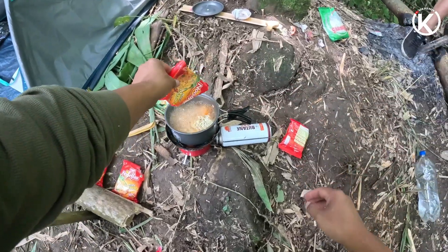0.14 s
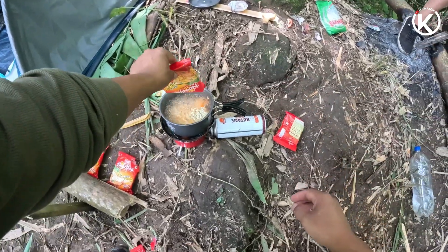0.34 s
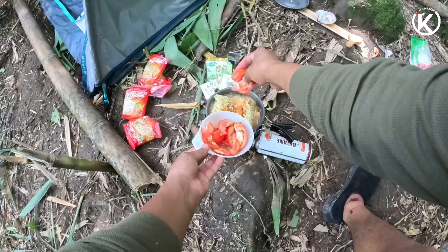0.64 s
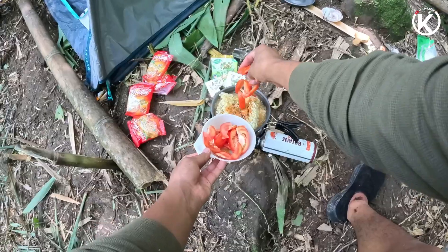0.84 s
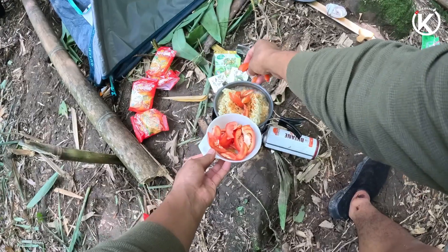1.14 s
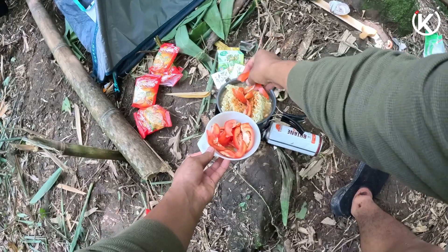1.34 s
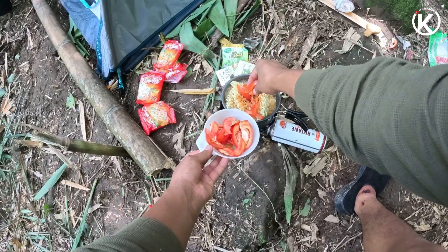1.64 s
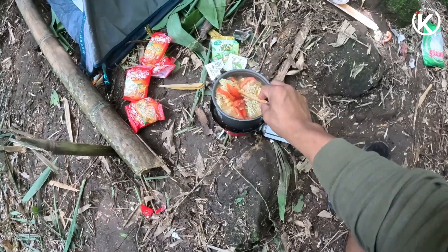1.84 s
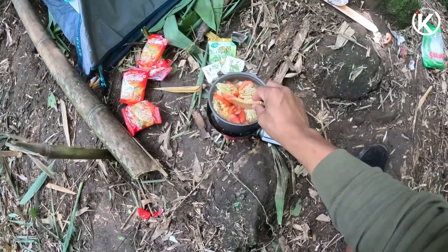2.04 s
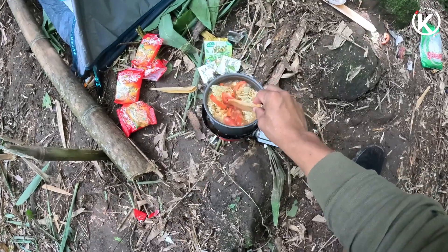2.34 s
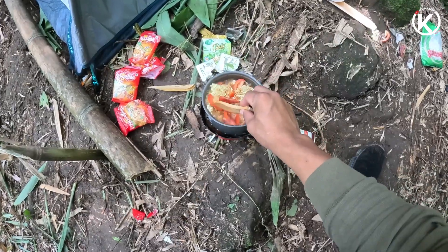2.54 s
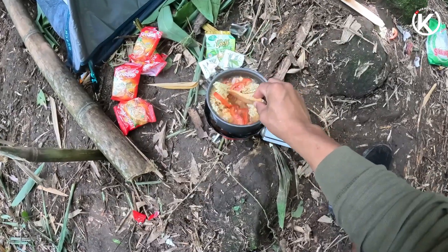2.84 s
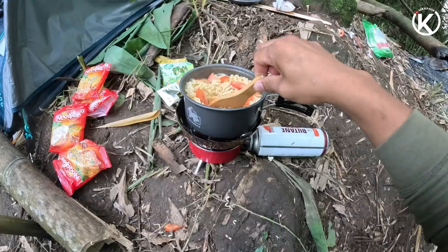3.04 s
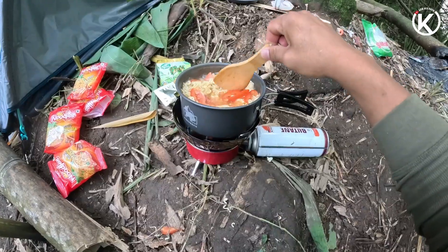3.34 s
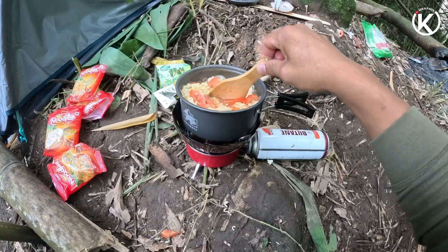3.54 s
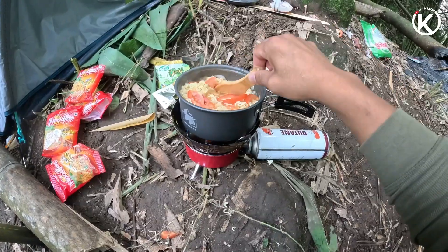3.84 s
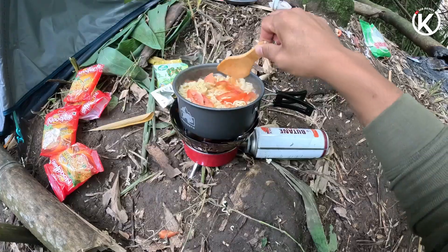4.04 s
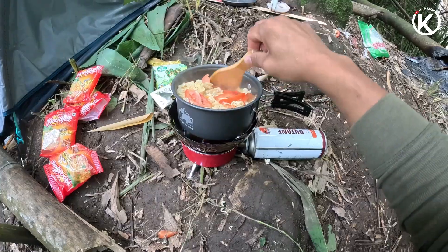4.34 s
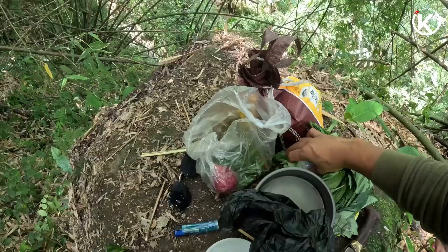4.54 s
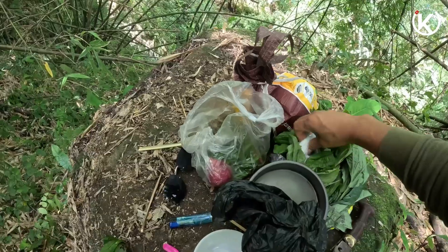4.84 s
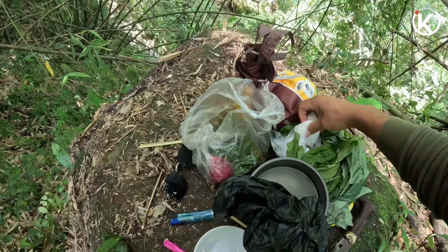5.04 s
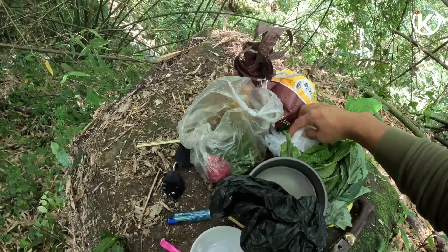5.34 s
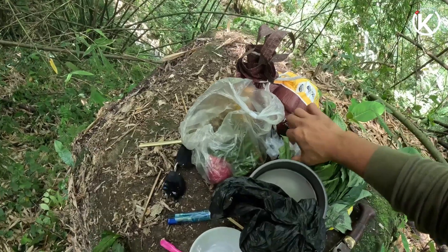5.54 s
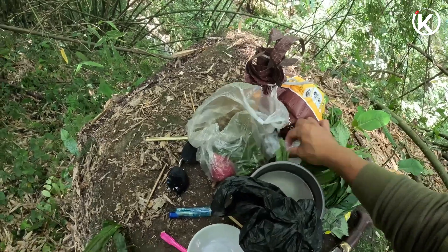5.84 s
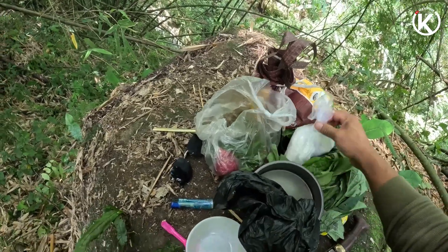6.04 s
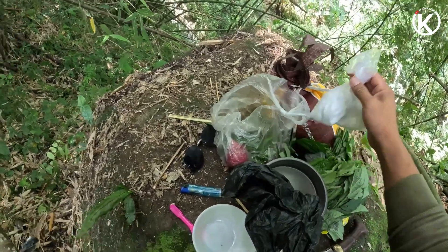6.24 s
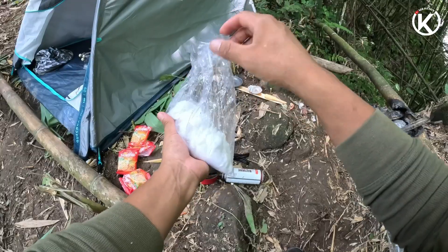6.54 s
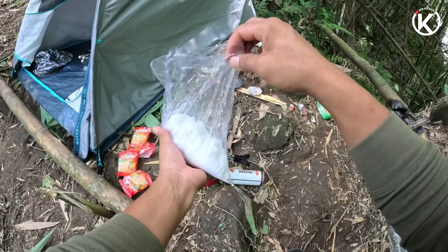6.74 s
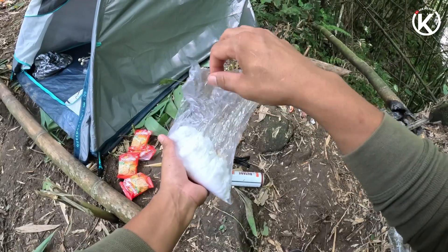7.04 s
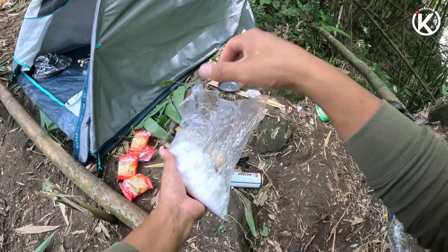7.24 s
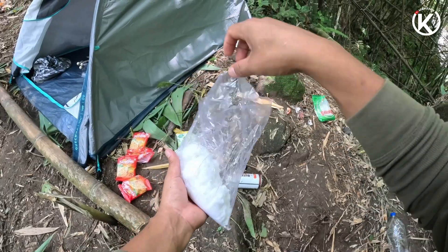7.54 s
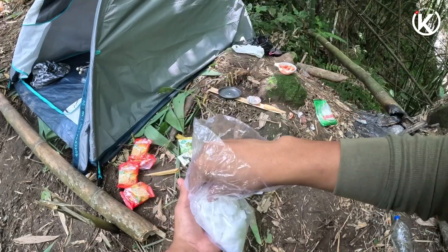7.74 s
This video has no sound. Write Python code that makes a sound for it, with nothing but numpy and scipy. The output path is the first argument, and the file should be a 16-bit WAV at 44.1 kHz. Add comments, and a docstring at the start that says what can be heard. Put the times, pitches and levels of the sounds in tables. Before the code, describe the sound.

Steady gas hiss and soft bubbling at a forest camp, spoon clacks and rummaging, then sharp thin plastic crackles over buzzing insects.

```python
"""A gas burner roars and hisses under a simmering pot at a forest camp, heard by microphones worn on the chest.
The flame and jet are shaped noise; the broth is many tiny rising tones and a sizzle of clicks.
Far insects drone as narrow noise bands and one whines as a wavering tone near 8 kHz.
Hands stir, rummage through leaves and crumple a thin plastic bag: showers of clicks, with louder snaps and bumps.
Air and body movement rock the microphones. Seven short shots fade in quickly, with brief silences between."""
import sys
import numpy as np
from scipy import signal
from scipy.fft import rfft, irfft, next_fast_len
from scipy.io import wavfile
from scipy.ndimage import uniform_filter1d

SR = 44100
rng = np.random.default_rng(int(sys.argv[2]) if len(sys.argv) > 2 else 0)


def put_to_file(sound):
    """Save the sound as 16-bit audio at rate SR, in the file named by the first command-line argument."""
    columns = np.atleast_2d(sound).T  # one column per channel
    safe = np.clip(columns, -1, 1)
    whole_steps = np.round(safe * 32767)
    wavfile.write(sys.argv[1], SR, whole_steps.astype(np.int16))


def field_ratio(decibels):
    """Amplitude ratio for a level in dB (20 dB per decade); scalars and array-likes work."""
    return 10 ** (np.asarray(decibels, dtype=float) / 20)


N = 348390
TIME, HZ = np.arange(N) / SR, np.fft.rfftfreq(next_fast_len(N), 1 / SR)

# how busy the hands are, stirring and then rummaging; they are idle after the last row:
# (time [s], rustle level [dB], dull knocking level [dB])
HAND_ACTIVITY = [(0.0, -49, -56), (0.14, -45, -60), (0.25, -49.5, -71), (0.55, -52, -51),
                 (0.62, -64, -53.5), (1.1, -57.5, -54), (1.73, -50.5, -55.5), (1.8, -51, -50),
                 (2.2, -50, -72), (2.55, -47.5, -53), (2.88, -50.5, -62), (2.96, -57.5, -70),
                 (3.7, -53.5, -67), (3.85, -54, -51.5), (4.0, -55, -70), (4.15, -51, -57),
                 (4.41, -53.5, -64), (4.49, -44.5, -48.5), (5.2, -40.5, -49.5), (5.28, -46.5, -73),
                 (5.38, -42, -49), (5.62, -42.5, -51.5), (5.9, -41, -43.5), (6.06, -39, -46.5),
                 (6.3, -41.5, -57)]


def unit(x):
    """Scale to an rms (average strength) of 1."""
    return x / np.sqrt(np.mean(x ** 2))


def sound(spectrum):
    """Turn a spectrum back into samples."""
    return irfft(spectrum, next_fast_len(N))[..., :N]


def filtered(x, gain):
    """Make each frequency louder or softer by its own gain."""
    return sound(rfft(x, next_fast_len(N)) * gain)


def colour(points):
    """Gain per frequency through (Hz, dB) points, dropping 30 dB just outside them."""
    hz, db = np.transpose(points)
    all_hz = np.r_[hz[0] / 2, hz, hz[-1] * 1.2]
    all_db = np.r_[db[0] - 30, db, db[-1] - 30]
    return field_ratio(np.interp(np.log(HZ + 1), np.log(all_hz), all_db))


def peak(hz, width):
    """Power shape of one resonance, a pitch that rings out above its neighbours."""
    return 1 / (1 + (2 * (HZ - hz) / width) ** 2)


def noise(gain):
    """Spectra of two unrelated noises with the given gain per frequency."""
    real, imaginary = rng.standard_normal((2, 2, len(HZ)))
    return (real + 1j * imaginary) * gain


def walk(rate):
    """A wandering curve: random levels 1 / rate seconds apart, joined by ramps; spread 1."""
    levels = rng.standard_normal(int(rate * TIME[-1]) + 2)
    steps = uniform_filter1d(np.repeat(levels, 4), size=4)
    return np.interp(TIME * rate * 4, np.arange(len(steps)), steps / steps.std())


def flutter(gain, centres, flicker_db, rate):
    """Two streams of coloured noise whose pitch ranges flicker on their own."""
    source = noise(gain)
    total = 0
    for row in np.eye(len(centres)):
        one_range = np.interp(np.log(HZ + 1), np.log(centres), row)
        total = total + field_ratio(flicker_db * walk(rate)) * sound(source * one_range)
    return unit(total)


def grains(count, spread_db):
    """Two unrelated streams of clicks at random times, a few of them much louder."""
    out = np.zeros((2, N))
    loudness = field_ratio(spread_db * np.minimum(rng.exponential(size=(2, count)), 5))
    size = rng.standard_normal((2, count)) * loudness
    np.put_along_axis(out, rng.integers(0, N, (2, count)), size, axis=1)
    return out


def crackle(points, count, spread_db, ring_s):
    """Creases of three sizes snap independently, each in its own range and smeared into a short burst."""
    spectrum = 0
    for k in range(3):
        octaves = np.log2(np.maximum(HZ, 1500) / 1500)
        size = 0.14 + np.clip(1 - abs(octaves / 1.49 - k), 0, 1)
        # a randomly drifting phase spreads each click out in time
        phase = np.cumsum(rng.standard_normal(len(HZ))) * np.sqrt(ring_s * 4 * np.pi * HZ[1])
        clicks = rfft(grains(count, spread_db), next_fast_len(N))
        spectrum = spectrum + clicks * size * np.exp(1j * phase)
    return unit(sound(spectrum * colour(points)))


def per_shot(name):
    """Hold one named column of the shot table (or the shot's number) until the next shot starts."""
    # (start [s], end [s], flame roar [dB], gas hiss [dB], sizzle [dB], insect drone [dB], whine [dB],
    #  stereo width [0-1], lag of the left side [rad])
    shots = np.array([(-.050, 0.551, -61, -47, -55.5, -56, -55.5, 0.31, 0.53),
                      (0.603, 1.733, -52.5, -46.5, -58, -59, -56, 0.31, 0.49),
                      (1.783, 2.89, -52.5, -47, -53, -54, -55, 0.33, 0.4),
                      (2.941, 4.418, -50.5, -48.5, -77, -51.5, -66, 0.03, .01),
                      (4.467, 6.302, -58, -46, -54.5, -43, -73, 0.34, 0.38),
                      (6.35, 7.674, -54.5, -46.5, -59.5, -50, -81, 0.23, 0.064),
                      (7.724, 7.950, -54, -42, -54.5, -48.5, -72, 0.29, 0.21)])
    names = ["start", "end", "roar", "hiss", "sizzle", "drone", "whine", "width", "lag"]
    shot = np.clip(np.searchsorted(shots[:, 0], TIME) - 1, 0, None)
    return shot if name == "number" else shots[shot, names.index(name)]


def insects():
    """Many far singers blur into noise bands near multiples of one buzz rate; one holds a thin, wavering whine."""
    # bands of the drone: (pitch [Hz], width of the resonance shape [Hz], level against the other bands [dB])
    drone_bands = [(981, 65, -1.5), (1951, 122, -1), (2950, 170, -3.5), (3836, 53, -1.5), (4935, 170, -10)]
    bands = 0
    for hz, width, db in drone_bands:
        bands = bands + field_ratio(db + 0.79 * walk(30)) * sound(noise(peak(hz, width) ** 0.68))

    whine_hz, waver_hz, flicker_db = 7957, 12.2, 1.7
    turn = 2 * np.pi * np.cumsum(whine_hz + waver_hz * walk(40)) / SR
    whine = unit(np.sin(turn) * field_ratio(flicker_db * walk(25.1)))
    shares = np.array([[1], [.3]])  # weaker in the stream that differs between the ears
    return field_ratio(per_shot("drone")) * unit(bands) + field_ratio(per_shot("whine")) * whine * shares


def sway():
    """Slow pressure swings, partly unlike on the two ports, swelling at random and at each lurch."""
    # tone of air and body movement: (frequency [Hz], gain [dB])
    sway_tone = [(2.4, -32), (4.0, 1.5), (17, 2), (25, -1), (60, -9), (87, -25), (120, -22.5), (160, -47),
                 (260, -120)]
    # air and body movement on the microphones, one value per shot: (level [dB])
    sway_levels = np.array([-59.5, -53.5, -44, -54.5, -53.5, -55, -52])
    # lurches of the body that rock the microphones harder: (time [s], level added [dB])
    body_lurches = [(1.9, -48), (4.07, -46), (5.08, -48), (5.6, -43), (6.05, -52), (6.17, -51), (6.51, -51),
                    (6.79, -51), (7.5, -47), (7.74, -49)]
    wander_db, lurch_s = 3, 0.05  # random swell; time from a lurch's middle until it has mostly faded
    both, apart = unit(sound(noise(colour(sway_tone))))
    level = field_ratio(sway_levels[per_shot("number")] + wander_db * walk(7))
    for s, db in body_lurches:
        level = level + field_ratio(db) * np.exp(-((TIME - s) / lurch_s) ** 2)
    return level * (both + 1.3 * per_shot("width") * apart * np.array([[1], [-1]]))


def bumps():
    """A dull bump on the microphone body is one hard push and a fainter ring, later on the left port."""
    # (time [s], peak level [dB], pitch [Hz], time for the ring to fade by 60 dB [s], left minus right [dB])
    body_bumps = [(0.533, -29, 180, 0.04, -2), (0.698, -36, 260, 0.05, -10), (0.749, -38, 221, 0.04, -2.0),
                  (0.999, -30, 570, 0.029, 0.5), (1.228, -34, 288, 0.045, -6), (1.699, -38, 164, 0.04, -5),
                  (1.792, -21, 174, 0.061, -8), (2.48, -20, 360, 0.055, -11), (2.496, -15, 330, 0.035, -6),
                  (2.51, -18, 343, 0.037, -15), (4.048, -28, 41.3, 0.033, 0), (4.514, -36, 509, 0.031, -5),
                  (5.829, -38, 607, 0.04, 4), (5.879, -24, 600, 0.15, -2), (5.949, -36, 560, 0.037, 3),
                  (6.189, -26.5, 199, 0.08, -0.5), (7.737, -34, 94, 0.029, 2)]
    left_lag_rad = 1.24
    overtone, overtone_db = 2.3, -8  # the body's second way of ringing: pitch ratio and level
    out = np.zeros((2, N + SR))
    t = np.arange(SR // 8) / SR
    for s, db, hz, t60, pan_db in body_bumps:
        push = 0.95 * np.exp(-((t * hz - .75) / 0.21) ** 2)
        fade = field_ratio(-60 * t / max(t60, .005)) + push
        turn = 2 * np.pi * hz * t - np.array([[left_lag_rad], [0]])
        tones = np.sin(turn) + field_ratio(overtone_db) * np.sin(overtone * turn)
        ring = tones * fade * np.minimum(t * hz * 2, 1)  # starts up within half a cycle
        i = int(s * SR)
        out[:, i:i + len(t)] += field_ratio(db + np.array([[pan_db], [-pan_db]]) / 2) * ring / abs(ring).max()
    return out[:, :N]


def hands():
    """Dense small crackles that come in fits, with duller knocks and gurgles under them."""
    # tone of the rustle and of the knocks: (frequency [Hz], gain [dB])
    rustle_tone = [(700, -24), (1500, -5), (3000, -2), (4200, -4), (6000, -6), (8900, -10.5), (11000, -28),
                   (12200, -30), (13300, -35), (15000, -38)]
    knock_tone = [(120, -31), (300, -3.5), (580, 6.5), (850, -5.5), (1600, -5), (3000, -27)]
    s, rustle_db, knock_db = np.transpose(HAND_ACTIVITY)
    rustle = crackle(rustle_tone, count=9000, spread_db=1.0, ring_s=0.00041)
    rustle = rustle * field_ratio(0.59 * walk(30) + 0.47 * walk(6.6))
    knock = unit(filtered(grains(count=2400, spread_db=0.5), colour(knock_tone))) * field_ratio(2.84 * walk(9))
    rustle_level = field_ratio(np.interp(TIME, s, rustle_db, right=-120))
    knock_level = field_ratio(np.interp(TIME, s, knock_db, right=-120))
    return rustle_level * rustle + knock_level * knock


def bag():
    """Each squeeze is a quick swell of creases giving way, ragged within."""
    # tone of the thin plastic: (frequency [Hz], gain [dB])
    bag_tone = [(35, -23), (60, 1.5), (209, -7), (276, -8.5), (711, -3), (1420, -11), (2650, -6),
                (3120, -9), (5430, -9.5), (6530, -15), (7500, -11.5), (9900, -21), (15000, -41.5)]
    # a wrapper crumples, the spoon scrapes, the bag is squeezed:
    # (start [s], length [s], share spent rising [0-1], level [dB], brightness tilt [relative, positive is brighter])
    squeezes = [(.004, 0.03, 0.85, -41, 5.5), (0.102, 0.048, 0.55, -43.5, 6),
                (4.221, 0.057, 0.6, -45, -2.5), (6.055, 0.065, 0.3, -36.5, 3),
                (6.258, 0.013, 0.4, -41.5, -1), (6.328, 0.23, 0.29, -33.5, 1.9),
                (6.59, 0.092, 0.14, -43, 0), (6.668, 0.065, 0.42, -35, 1.8), (6.724, 0.12, 0.6, -28, 0.7),
                (6.872, 0.044, 0.36, -31.5, 1), (6.92, 0.056, 0.46, -39, 1.2),
                (7.378, 0.022, 0.25, -41.5, -7), (7.397, 0.028, 0.16, -31.5, -1),
                (7.44, 0.029, 0.56, -31.5, -2), (7.457, 0.055, 0.09, -28.5, 0.2),
                (7.484, .055, 0.54, -31, -0.5), (7.54, .030, 0.5, -43, -1), (7.571, 0.039, 0.3, -36.5, 1),
                (7.630, 0.018, .3, -46, 1), (7.806, 0.07, 0.4, -37, 1.5), (7.872, 0.028, 0.05, -34.5, 1.5)]
    creases = crackle(bag_tone, count=22000, spread_db=2.5, ring_s=0.00029) * field_ratio(1.15 * walk(120))
    bright = unit(filtered(creases, np.log2((HZ + 50) / 2000)))
    out = np.zeros((2, N))
    for start, length, rise, db, tilt in squeezes:
        now = slice(int(start * SR), int((start + length) * SR))
        corners = [start, start + rise * length, start + length]
        swell = np.interp(TIME[now], corners, [0, 1, 0]) ** .5
        tilted = creases[:, now] + np.log(10) / 20 * tilt * bright[:, now]
        out[:, now] += field_ratio(db) * swell * tilted
    return out


def ticks(count):
    """Rows of fainter snaps, scattered while the hands work and as loud as they are busy."""
    s, rustle_db, _ = np.transpose(HAND_ACTIVITY)
    when, size, pitch, pan = rng.random((count, 4)).T
    when = .01 + when * s[-1]
    db = np.interp(when, s, rustle_db) + 12 - 8 * size  # 4 to 12 dB above the rustle level
    hz = 3500 * 2 ** (2.5 * (pitch - .5))
    octaves = np.full(count, 1.3)
    return np.transpose([when, db, hz, octaves, 4 * (pan - .5)])


def snaps():
    """A snap is a burst of a few cycles that starts fast and dies away a little slower."""
    # the clearest snaps of creases, spoon and simmer:
    # (time [s], peak level [dB], pitch [Hz], width [octaves], left minus right [dB])
    clear_snaps = [(0.0982, -16.5, 8500, 0.99, 5), (0.1045, -34, 1300, 0.8, 0),
                   (0.1295, -23, 4300, 0.55, 1), (2.4288, -24, 4280, 1, 0), (2.4975, -22, 2510, 1.1, 4),
                   (2.578, -28, 1600, 0.61, 0), (2.68, -27, 2330, 1.5, -1), (2.7838, -28, 3600, 1.2, -2),
                   (2.8608, -26, 1470, 0.69, -1), (3.4463, -32.5, 1170, 0.73, 0),
                   (3.765, -17.5, 2920, 1.8, 4), (3.797, -21.5, 2730, 0.97, 4),
                   (3.9176, -33, 1280, 0.61, 0), (4.1716, -26.5, 1670, 1.4, -1.5),
                   (4.2392, -24, 1220, 1.9, 1), (4.7215, -23, 3930, 0.95, -1), (4.799, -20, 4860, 0.49, -1),
                   (5.1698, -12.5, 8900, 1.2, -2), (5.7219, -19, 8560, 1.24, 1),
                   (5.9554, -21, 7200, 1.7, -2), (6.057, -16, 6050, 1.4, -3), (6.0969, -16, 8560, 1.2, -3),
                   (6.265, -16.5, 9340, 1.7, -3), (6.2652, -23, 2250, 0.42, 0), (6.457, -20, 6560, 1, 1),
                   (6.7458, -13, 6000, 1.5, 4), (6.7625, -13, 7750, 0.59, -1), (6.8878, -17, 9340, 1.1, -1),
                   (6.955, -17, 4800, 0.75, 2), (7.3993, -23, 6050, 1.0, 4), (7.4947, -15, 9340, 1.25, 1),
                   (7.5058, -13, 6050, 1.9, 7), (7.854, -15, 8200, 0.66, 5), (7.8759, -12, 6360, 0.95, 4)]
    out = np.zeros((2, N + SR))
    t = np.arange(-SR // 200, SR // 50) / SR
    phases = 2 * np.pi * rng.random(size=99)
    for (s, db, hz, octaves, pan_db), phase in zip([*clear_snaps, *ticks(count=24)], phases):
        length = .5 / (hz * max(octaves, .2))  # wide snaps are short
        shape = np.where(t < 0, np.exp(-(t / length) ** 2), np.exp(-t / (1.8 * length)))
        snap = np.cos(2 * np.pi * hz * t + phase) * shape
        i = int((s + t[0]) * SR)
        out[:, i:i + len(t)] += field_ratio(db + np.array([[pan_db], [-pan_db]]) / 2) * snap
    return out[:, :N]


def bubbles(count):
    """Each bubble rings a few cycles and glides up as it reaches the surface."""
    out, t = np.zeros((2, N + 800)), np.arange(800) / SR
    chance = rng.random((2, count, 3))  # pitch, loudness and time of each bubble
    hz = 1150 * 2 ** (1.25 * (chance[..., :1] - .5))
    tone = np.sin(2 * np.pi * hz * t * (1 + 0.014 * hz * t))
    ring = field_ratio(-14 * chance[..., 1:2]) * tone * np.exp(-t * hz / 7.8)
    for stream in range(2):
        starts = (chance[stream, :, 2:] * N).astype(int)
        np.add.at(out[stream], starts + np.arange(len(t)), ring[stream])
    return unit(out[:, :N])


def burner():
    """The flame roars unevenly, the jet hisses, the broth bubbles and sizzles."""
    # tones of the flame, the gas jet and the sizzle: (frequency [Hz], gain [dB])
    roar_tone = [(60, -9), (110, -2), (220, 1.5), (400, -5), (700, -27), (1500, -51)]
    hiss_tone = [(150, 2.5), (500, 0), (1300, 2), (2500, -1), (4200, -1), (5600, -9.5), (7000, -13.5),
                 (9500, -16), (11000, -25), (12000, -23.5), (13200, -33), (15000, -40)]
    sizzle_tone = [(3500, -23), (5600, -6.5), (7400, 8.5), (9000, 1.5), (10500, -11), (12000, -34),
                   (13300, -36), (15000, -35)]
    # resonances under the pot: (pitch [Hz], width [Hz], height above the hiss [dB])
    pot_resonances = [(3780, 360, 3.5), (4640, 120, 3.5), (5610, 390, 7.5)]
    # bubbling broth, one value per shot: (level [dB])
    simmer_levels = [-62, -53.5, -56.5, -64, -67, -70, -75]
    roar = flutter(colour(roar_tone), [80, 156, 322, 640], flicker_db=2.0, rate=11)
    jet = colour(hiss_tone) * field_ratio(sum(db * peak(hz, width) for hz, width, db in pot_resonances))
    hiss = flutter(jet, [400, 1000, 2200, 4500, 9000], flicker_db=0.54, rate=9)
    sizzle = unit(filtered(grains(count=70000, spread_db=2.5), colour(sizzle_tone)))
    simmer = field_ratio(simmer_levels)[per_shot("number")] * bubbles(count=700)
    flame = field_ratio(per_shot("roar")) * roar + field_ratio(per_shot("hiss")) * hiss
    return flame + field_ratio(per_shot("sizzle")) * sizzle + simmer


def scene():
    """Mix a shared and an unlike stream; the left port hears the shared one late, and more of it near 11 kHz."""
    # how unlike the two microphone ports hear each pitch: (frequency [Hz], gain [dB])
    port_difference = [(30, -11), (150, -14.5), (600, -4.5), (2000, 3), (5000, 1.5), (8500, 1), (10200, 0),
                       (11300, 8), (12500, 6), (15000, 10)]
    shared, unlike = burner() + insects() + hands() + bag()
    late = filtered(shared, -1j / (1 + (HZ / 4500) ** 2))  # a quarter cycle late
    lean = filtered(shared, 2.6 * np.exp(-((HZ - 11300) / 900) ** 2))
    side = per_shot("width") * (filtered(unlike, colour(port_difference)) + lean)
    side = side + np.tan(per_shot("lag") / 2) * late
    # the capsule dulls the top of every snap
    knocks = filtered(snaps() + bumps(), 1 / np.sqrt(1 + (HZ / 9500) ** 14))
    return shared + side * np.array([[1], [-1]]) + knocks + sway()


def top_cut(x):
    """Nothing passes above the cut-off."""
    return signal.sosfilt(signal.butter(12, 15750, fs=SR, output="sos"), x)


def record(dry):
    """Port noise shows near 11 kHz where the capsule is dull; each shot stops dead and the next fades in."""
    # the microphones' own noise, left row and right row: (level [dB])
    self_noise = np.array([[-80], [-84]])
    hiss = unit(sound(noise(colour([(10000, -22), (11300, -2), (12500, -8), (14800, -12)]))))
    fade_s = 0.017
    fade_in = np.clip((TIME - per_shot("start")) / fade_s, 0, 1)
    gate = fade_in * (TIME < per_shot("end"))
    return top_cut((dry + field_ratio(self_noise) * hiss) * gate)


dry = scene()
out = record(dry)
put_to_file(out)
```